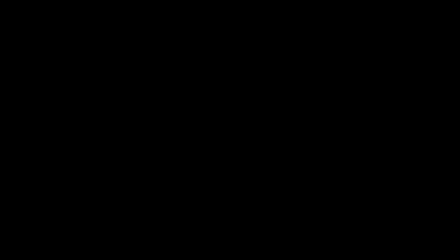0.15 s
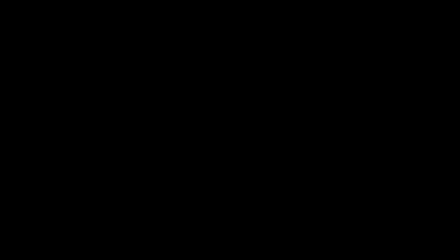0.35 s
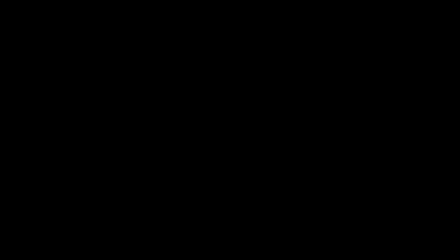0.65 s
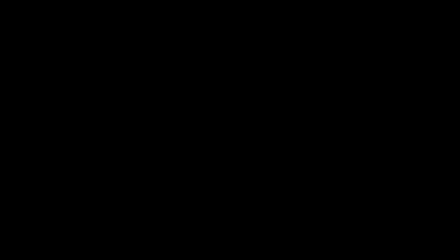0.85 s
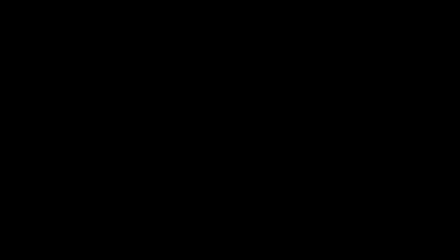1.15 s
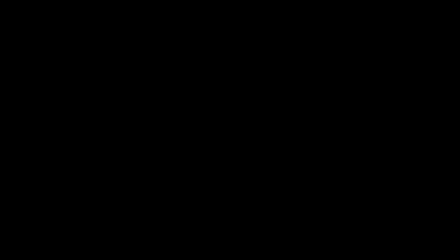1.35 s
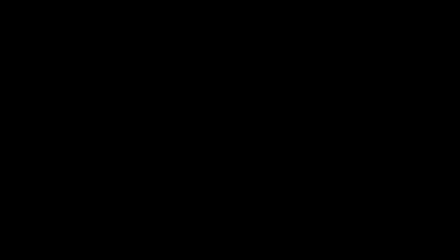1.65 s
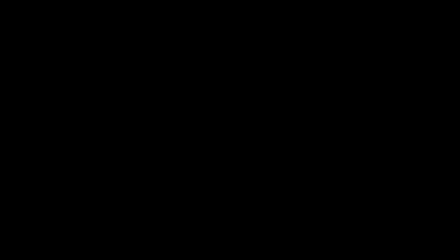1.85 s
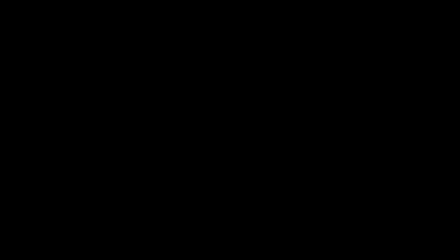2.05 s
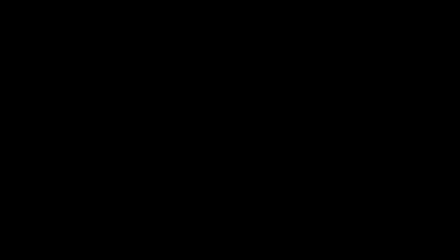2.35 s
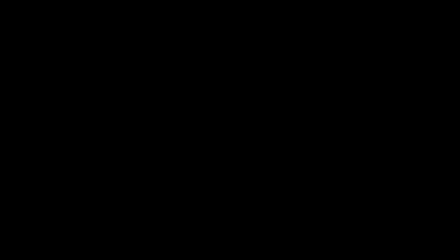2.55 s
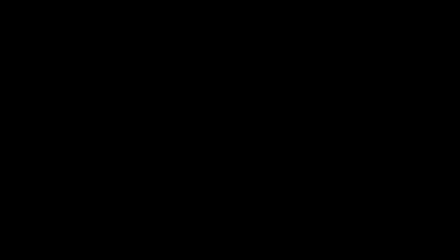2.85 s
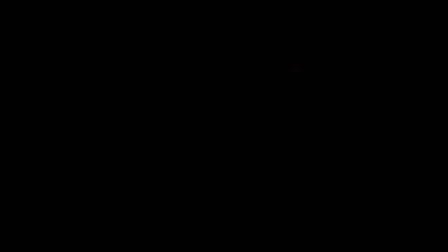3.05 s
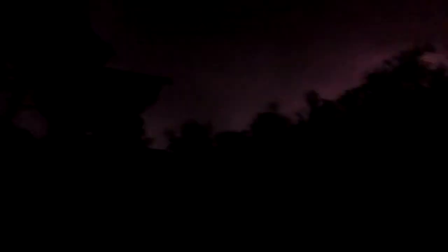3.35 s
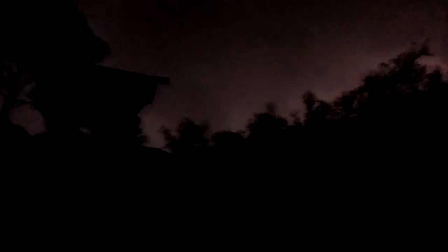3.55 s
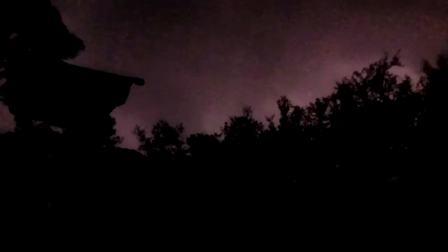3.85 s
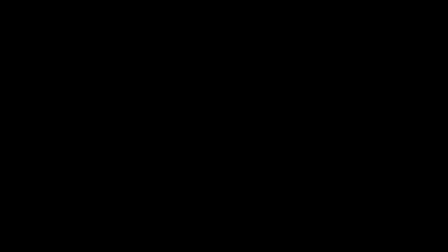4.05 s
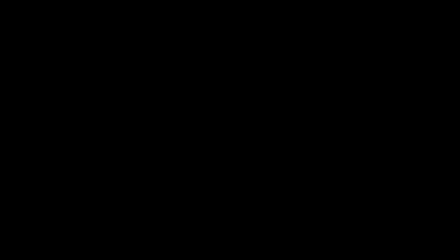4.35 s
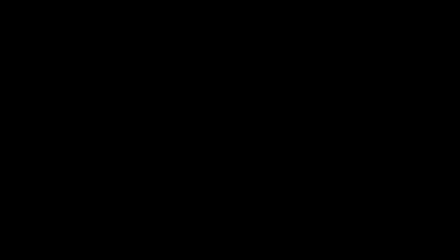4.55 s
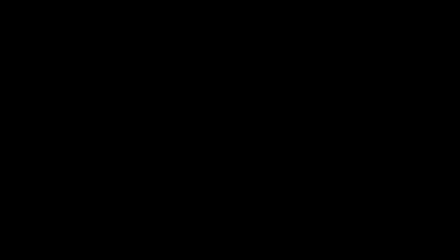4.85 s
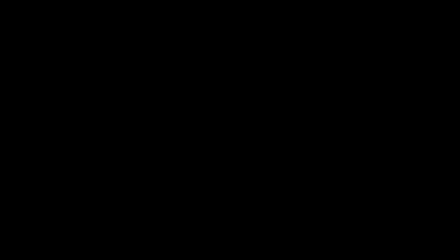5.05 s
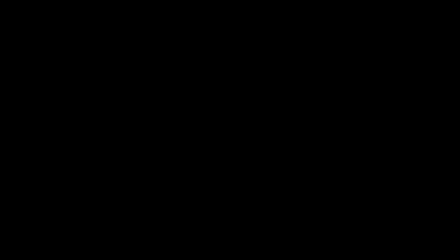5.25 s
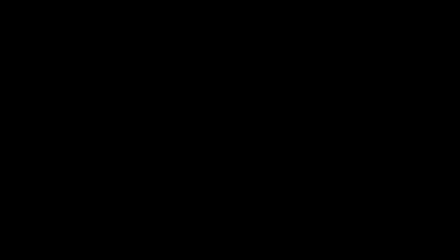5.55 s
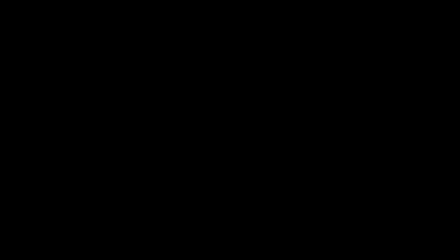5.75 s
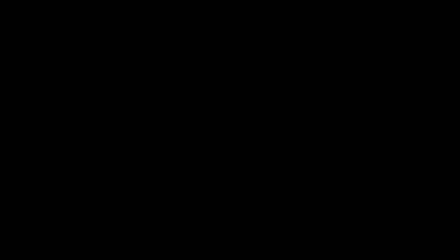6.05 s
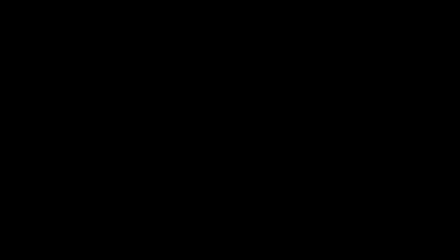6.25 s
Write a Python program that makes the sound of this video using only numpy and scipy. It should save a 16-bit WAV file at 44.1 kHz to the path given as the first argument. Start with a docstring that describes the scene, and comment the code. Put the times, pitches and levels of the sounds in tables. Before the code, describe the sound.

A garden before rain: quiet airy hush and insects, then bass-heavy thunder swells in overlapping waves, slightly squashed by automatic level control at its loudest. It recedes gradually, leaving a steady thin cricket trill, small leaf brushes and increasing light patter. A few hard, dry drops click near the microphone, including small clusters towards the end. The thunder is muffled and far, with no sharp crack.

```python
"""Distant thunder over a garden at night

Thunder swells and rolls in overlapping peals: bands of roaring noise under peal and surge envelopes. A tree
cricket trills (a pulsed tone); three smaller insects chirp higher up (whistles in raspy noise). Sharp drops
like first raindrops land near the microphone (damped modes and a noise splash), with fainter patter. Thin
glassy ticks flicker near 12 kHz, mostly while the thunder is loudest. A light breeze stirs rustles and a hush
of air (coloured noise). The recorder's gain control pulls everything down while the thunder is loudest."""
import sys
import numpy as np
from scipy import signal
from scipy.fft import rfft, irfft, next_fast_len
from scipy.io import wavfile
from scipy.ndimage import uniform_filter1d, map_coordinates

SR = 44100
rng = np.random.default_rng(int(sys.argv[2]) if len(sys.argv) > 2 else 0)


def to_wav(sig):
    """Store sig (one row per channel, or 1-D mono) as 16-bit WAV at the path in sys.argv[1].

    Samples outside -1..1 are clipped; the rate is SR.
    """
    pcm = np.clip(np.atleast_2d(sig), -1, 1) * 32767
    pcm = np.round(pcm).astype(np.int16)
    wavfile.write(sys.argv[1], SR, pcm.T)  # frames by channels


N = 283563


def amp(db):
    """Decibels to gain."""
    return 10 ** (np.asarray(db) / 20)


def unit(x):
    """Scale to rms 1."""
    return x / np.sqrt(np.mean(x ** 2) + 1e-20)


def along(points, hz):
    """Interpolate (frequency [Hz], value) points on a log frequency axis."""
    point_hz, values = np.transpose(points)
    return np.interp(np.log(hz + 1), np.log(point_hz + 1), values)


def curve(points):
    """One value per sample from (time [s], value) points."""
    time_s, values = np.transpose(points)
    return np.interp(np.arange(N) / SR, time_s, values)


def wobble(rate_hz):
    """Smooth random curve through rate_hz random knots a second."""
    knots = rng.standard_normal(int(N * rate_hz / SR) + 4)
    return map_coordinates(knots, [np.arange(N) * rate_hz / SR])


def filtered(x, response):
    """Multiply the spectrum of x by response(hz)."""
    size = next_fast_len(len(x) + SR // 4)
    spectrum = rfft(x, size) * response(np.fft.rfftfreq(size, 1 / SR))
    return irfft(spectrum, size)[:len(x)]


def noise(response):
    """Coloured noise of rms 1."""
    return unit(filtered(rng.standard_normal(N), response))


def patchy(response, depth_db, size=512):
    """Coloured noise of rms 1 that glitters in small patches of time and pitch."""
    z = signal.stft(rng.standard_normal(N), nperseg=size)[2]
    field = rng.standard_normal(z.shape)
    for axis in (0, 0, 1, 1):
        field = uniform_filter1d(field, size=3, axis=axis)
    glitter = signal.istft(z * amp(depth_db * unit(field)), nperseg=size)[1][:N]
    return unit(filtered(glitter, response))


def below(hz, edge_hz, order):
    """Gain of a smooth low-pass."""
    return 1 / np.sqrt(1 + (hz / edge_hz) ** (2 * order))


def above(hz, edge_hz, order):
    """Gain of the matching high-pass."""
    return (hz / edge_hz) ** order * below(hz, edge_hz, order)


def swell(time_s, length_s):
    """Gaussian rise and fall centred on time_s, sigma = length_s / 2."""
    age_s = np.arange(N) / SR - time_s
    return np.exp(-np.minimum(2 * (age_s / length_s) ** 2, 50))


# far foliage, near foliage, microphone hiss: (frequency [Hz], relative density [dB per Hz])
HUSH_COLOUR = [(100, -1.5), (500, 12), (900, 8.5), (1400, 3.5), (1900, -3.5), (2500, -13), (3500, -16),
               (6000, -39)]
HISS_COLOUR = [(1500, -13.5), (2500, 4.5), (3050, 3.5), (3500, -1), (4600, -3.5), (6000, -7), (7200, -10),
               (8200, -29), (12000, -38.5)]
MIC_COLOUR = [(1000, -2.5), (8000, -5), (13500, -0.5), (14400, 8.5), (15200, 17), (15800, 13)]
# breeze: (time [s], strength [dB])
BREEZE_STRENGTH = [(0.3, 0.5), (0.7, 0), (1.6, -3.5), (2.5, -4), (3.2, -1.5), (4.0, 0.5), (4.8, 2),
                   (6.4, 2)]


def air(hush_db=-48.5, hiss_db=-65, hiss_follows=0.94, mic_db=-75):
    """Breeze draws an even hush from far foliage and a fluttering hiss from near leaves, over mic hiss."""
    breeze_db = curve(BREEZE_STRENGTH)
    stir_db = 1.6 * wobble(45)
    far = patchy(lambda hz: amp(along(HUSH_COLOUR, hz)), depth_db=1.2)
    near = patchy(lambda hz: amp(along(HISS_COLOUR, hz)), depth_db=3.4)
    mic = noise(lambda hz: amp(along(MIC_COLOUR, hz)))
    hush = amp(hush_db + breeze_db + stir_db / 5) * far
    hiss = amp(hiss_db + hiss_follows * breeze_db + stir_db) * near
    return hush + hiss + amp(mic_db) * mic


# clearest rustles: (time [s], length [s], level [dB], centre [Hz])
CLEAR_RUSTLES = [(.08, 0.42, -59.5, 3000), (0.323, 0.079, -64.5, 4400), (0.952, 0.015, -60, 4430),
                 (1.487, 0.022, -61.5, 3520), (1.58, .005, -54, 2200), (1.903, .006, -55, 2000),
                 (2.826, 0.021, -54.5, 2960), (3.145, 0.024, -53.5, 3080), (3.35, 0.019, -64.5, 5500),
                 (3.366, 0.037, -57.5, 1900), (3.983, 0.054, -62, 5140), (4.068, 0.056, -66, 3800),
                 (4.15, 0.026, -53.5, 3360), (4.251, 0.016, -65.5, 8900), (4.553, 0.0088, -61, 8700),
                 (4.57, 0.048, -58, 3800), (4.72, 0.024, -60, 3600), (4.85, 0.028, -64.5, 5300),
                 (5.04, 0.11, -60, 4900), (5.147, 0.0085, -52.5, 4300), (5.25, 0.058, -61, 3800),
                 (5.4, 0.057, -56, 3900), (5.625, 0.014, -50, 2480), (5.781, 0.027, -54, 4400),
                 (6.205, 0.03, -55.5, 3660), (6.31, 0.13, -54.5, 2270), (6.341, 0.022, -59, 4000)]


def rustles(grain_db=4, octaves=0.51, stirs_from_s=3.9,
            faint_db=-67, faint_hz=4000, faint_length_s=0.019, count=10):
    """Brief grainy brushes of band noise; faint ones come at random once the breeze picks up."""
    out = np.zeros(N)
    glitter = patchy(np.ones_like, depth_db=2.2)
    grain = amp(grain_db * wobble(500)) * glitter
    slot_s = (N / SR - stirs_from_s) / count
    faint = []
    for k, (when, size, tune) in enumerate(rng.random((count, 3))):
        time_s = stirs_from_s + (k + when) * slot_s
        length_s = faint_length_s * 2 ** (size - .5)
        faint.append((time_s, length_s, faint_db, faint_hz * 2 ** (tune - .5)))
    for time_s, length_s, db, centre_hz in CLEAR_RUSTLES + faint:
        def band(hz):
            distance = np.log2((hz + 1) / centre_hz) / octaves
            return amp(-24 * np.log2(np.hypot(1, distance)))
        out += amp(db) * swell(time_s, length_s) * unit(filtered(grain, band))
    return out


def struck(modes, pitch_hz, t, damping=1):
    """Heavily damped modes of alternating sign, a little different at each blow; peak 1."""
    ring = np.zeros(len(t))
    for k, (ratio, width_hz, db) in enumerate(modes):
        gain = (-1) ** k * amp(db + rng.normal(0, 0.58))
        decay = np.exp(-np.pi * width_hz * damping * t)
        ring += gain * width_hz * decay * np.sin(2 * np.pi * pitch_hz * ratio * t)
    ring *= 1 - np.exp(-(t / 0.00016) ** 2)  # soft contact
    return ring / np.abs(ring).max()


# modes rung by near and far drops: (pitch ratio, width before damping [Hz], relative level [dB])
RING_MODES = [(.8, 429.5, -13.5), (1.03, 362.6, -3), (1.14, 388, -2), (1.28, 400, -12.5), (1.61, 565, -19)]


def patter(db=-56.5, spread_db=3.8, centre_hz=3300, octaves=2.2, thickens=0.45, count=70):
    """Farther drops ring at random, more of them as time goes on, each with its own small pitch."""
    out, t = np.zeros(N + SR), np.arange(SR // 50) / SR
    for when, size, tune in rng.random((count, 3)):
        start = int(when ** thickens * N)
        gain = amp(db - spread_db * np.log(size + 0.083))
        pitch_hz = centre_hz * 2 ** (octaves * (tune - .5))
        out[start:][:len(t)] += gain * struck(RING_MODES, pitch_hz, t)
    return out[:N]


# clearest ticks: (time [s], level before gain_db [dB])
CLEAR_TICKS = [(1.0203, -57), (1.3204, -56), (1.501, -47.5), (1.6806, -52.5), (1.7409, -49.5),
               (1.8815, -54.5), (2.024, -61), (2.182, -60), (2.501, -56.5), (3.285, -63)]


def ticks(gain_db=4, pitch_hz=12000, length_s=.0004,
          faint_db=-61, faint_spread_db=2, around_s=1.9, spread_s=.45, count=9):
    """Glassy sine bursts a few cycles long; fainter ones scatter around the loudest thunder."""
    t, envelope = np.arange(N) / SR, np.zeros(N)
    faint = [(around_s + spread_s * when, faint_db + faint_spread_db * size)
             for when, size in rng.standard_normal((count, 2))]
    for time_s, db in CLEAR_TICKS + faint:
        envelope += amp(db + gain_db) * swell(time_s, length_s)
    return envelope * np.sin(2 * np.pi * pitch_hz * t)


# chirping insects: (first chirp [s], initial period [s], slowing [1/s], pitch [Hz],
# whistle level before gain_db [dB], chirp length [s], rasp re whistle [dB], rest from [s], rest until [s])
CHIRPING_INSECTS = [(0.225, 0.323, 0.0155, 7170, -79, 0.07, -4, 1.0, 2.45),
                    (0.2, 0.274, 0, 7485, -79, 0.08, -6, 1.15, 3.35),
                    (0.06, 1.257, 0, 7170, -79, 0.11, 5, 1.7, 7)]


def chirpers(gain_db=2.5, scatter_db=2.0, jitter_s=.008, scatter_hz=12):
    """Unsteady whistles in a raspy noise skirt, repeated at each insect's pace, silent over its rest."""
    t, out = np.arange(N) / SR, np.zeros(N)
    for (first_s, period_s, slowing, pitch_hz, db, length_s, rasp_db,
         rest_from_s, rest_until_s) in CHIRPING_INSECTS:
        whistle = np.exp(.9j * wobble(90))
        real, imag = (noise(lambda hz: below(hz, 220, order=3)) for _ in range(2))
        voice = whistle + amp(rasp_db) * (real + 1j * imag) / np.sqrt(2)
        age_s = t - first_s + jitter_s * wobble(2.2)
        paced_s = age_s * (1 - slowing * age_s)
        from_chirp_s = (paced_s + period_s / 2) % period_s - period_s / 2
        envelope = np.exp(-2 * (from_chirp_s / length_s) ** 2)
        singing = 1. * ((t < rest_from_s) | (t > rest_until_s))
        song = amp(db + gain_db + scatter_db * wobble(4.1)) * envelope
        song *= uniform_filter1d(singing, size=2000)
        phase = 2 * np.pi * np.cumsum(pitch_hz + scatter_hz * wobble(4.1)) / SR
        out += np.sqrt(2) * song * (voice * np.exp(1j * phase)).real
    return out


# tree cricket effort: (time [s], relative level [dB])
TRILL_EFFORT = [(0, -6), (.35, 3), (1.2, 3), (2.1, -1.5), (2.5, -1.5), (3.4, 1.8), (3.51, 8.5), (3.62, 2),
                (3.85, 2), (4.2, 4.5), (5.3, 2), (6.4, 3.5)]


def tree_cricket(pitch_hz=3061, stroke_hz=66.5, db=-64.0, sharpness=1.4,
                 chorus_db=-70, chorus_width_hz=110):
    """Wing strokes pulse a tone that sags in pitch, uneven in strength; a far chorus is a noise band."""
    t = np.arange(N) / SR
    turn = 2 * np.pi * (stroke_hz * t + .1 * wobble(6))
    pulse = np.abs(np.sin(turn / 2)) ** sharpness
    sag = -.75 * np.cos(turn) + .35 * np.sin(turn)  # phase [rad]
    drift = 1.5 * wobble(11) + .18 * wobble(70) + sag
    wing = np.sin(2 * np.pi * pitch_hz * t + drift)
    unevenness = amp(1.3 * wobble(9) + 2 * wobble(55))
    near = amp(db) * unit(unevenness * pulse * wing)
    chorus = amp(chorus_db) * noise(lambda hz: below(hz - pitch_hz, chorus_width_hz, order=3))
    return amp(curve(TRILL_EFFORT)) * (near + chorus)


# near drops: (time [s], ring [dB], knock [dB], splash [dB], ring pitch [Hz], splash edge [Hz],
# ring damping [ratio])
NEAR_DROPS = [(1.2315, -27, -34, -53.5, 2950, 5400, 0.53), (2.3292, -9, -26, -10, 3000, 7300, 0.86),
              (4.387, -44, -54, -67, 2830, 5930, 0.9), (4.9743, -24, -22, -23.5, 3040, 6230, 0.61),
              (4.9983, -33.5, -41, -48, 2800, 5950, 1), (5.022, -34, -41, -38, 3030, 12000, 1),
              (5.0318, -32, -33, -18, 3630, 15000, 0.86), (5.8790, -19, -30, -27, 2740, 9000, 0.58),
              (5.893, -31, -27.5, -54, 2980, 6000, 1.2), (5.932, -24.5, -28, -17.5, 3240, 13660, 1.1)]
# knock modes: (pitch ratio, width [Hz], relative level [dB])
KNOCK_MODES = [(1, 237, 1), (1.42, 221, -2.5), (1.92, 310, -3)]
# splash colour: (frequency [Hz], relative density [dB per Hz])
SPLASH_COLOUR = [(700, -32), (2200, -20), (2900, -15.5), (4000, -3), (5800, .7), (7000, -7), (8500, -6.5),
                 (10500, -6.5), (13000, -17), (15200, -4), (16000, -8.5)]


def drops(knock_hz=960, echo_db=-20, echo_t60_s=0.085):
    """Each drop knocks, rings for a few milliseconds and splashes; the surroundings answer faintly."""
    out, t = np.zeros(N + SR), np.arange(SR // 8) / SR
    for time_s, ring_db, knock_db, splash_db, pitch_hz, edge_hz, damping in NEAR_DROPS:
        burst = rng.standard_normal(len(t)) * .07 * np.exp(-t / .0015) + (t == 0)
        burst = np.pad(burst, (20, 0))  # room for the zero-phase filter
        spray = filtered(burst, lambda hz: amp(along(SPLASH_COLOUR, hz)) * below(hz, edge_hz, order=4))
        spray = spray[:len(t)]
        ring = amp(ring_db) * struck(RING_MODES, pitch_hz, t, damping)
        knock = amp(knock_db) * struck(KNOCK_MODES, knock_hz, t)
        hit = ring + knock + amp(splash_db) * spray / np.linalg.norm(spray)
        tail = rng.standard_normal(len(t)) * amp(-60 * t / echo_t60_s)
        echo = signal.fftconvolve(hit, tail / np.linalg.norm(tail))[:len(t)]
        out[round(time_s * SR):][:len(t)] += hit + amp(echo_db) * echo
    return out[:N]


def rumble(roar, span_s=0.11):
    """Countless overlapping shock fronts merge into a roar of even strength over span_s."""
    size = max(int(span_s * SR), 2)
    power = uniform_filter1d(uniform_filter1d(roar ** 2, size), size)
    return unit(roar / np.sqrt(np.abs(power) + 1e-9))


def peal(crest_s, rise_s, fall_s):
    """Level of one peal [dB]: steady climb, rounded crest, steady decay."""
    t = np.arange(N) / SR - crest_s
    return -10 * (np.hypot(1, t / np.where(t < 0, rise_s, fall_s)) - 1)


# thunder colour: (frequency [Hz], relative density [dB per Hz])
THUNDER_COLOUR = [(12, -18), (22, -19), (43, -20.5), (60, -14.5), (75, -7), (100, -3.5), (122, 3),
                  (141, 3.5), (160, 2), (185, -2), (250, -8), (300, -10.5), (400, -19.5), (620, -30),
                  (850, -43), (1400, -83)]
# constant far storm: (depth, boom, body, growl) [dB]
FAR_STORM_LEVELS = [-41.5, -47.5, -46.5, -58]
# peals: (crest [s], rise [s], fall [s], level [dB], depth, boom and growl re level [dB])
THUNDER_PEALS = [(0.68, 0.19, 0.33, -37.5, -3, 4.3, -13.5), (1.099, 0.23, 0.33, -29, -4, 7.7, -11.5),
                 (1.448, 0.14, 0.3, -20.5, -5, 3.5, -19), (1.929, 0.45, 0.84, -20, -1, 8, -13),
                 (2.441, 0.2, 0.18, -24, -5, 7, -13), (2.849, 0.19, 0.19, -23.5, -4.5, 0.5, -9),
                 (3.382, 0.44, 0.23, -23.5, -6.5, -0.5, -9), (3.62, 0.07, 0.52, -35, 4.5, 9.5, -3),
                 (4.23, 0.16, 0.28, -29, -7.5, 4.4, -10.5), (4.88, 0.21, 0.34, -34, -6, 7.5, -10),
                 (5.08, 0.17, 0.16, -35.5, -5.5, 0, -7.5), (5.74, 0.34, 0.31, -34, 1.5, 8, -6.5),
                 (6.3, 0.4, .4, -38, -8, 5.4, -13)]
# surges rolling through the peals: (crest [s], sigma [s], level [dB], pitch [Hz])
ROLLING_SURGES = [(.48, 0.041, -35.5, 278), (1.041, 0.041, -24, 150), (1.42, 0.095, -20, 272),
                  (1.804, 0.092, -17.5, 70), (1.91, 0.043, -8, 140), (2.1, 0.056, -9, 141),
                  (2.242, 0.075, -20.5, 70), (2.465, 0.065, -13, 140), (2.636, 0.067, -22.5, 71),
                  (2.842, .06, -22, 70), (2.955, .06, -28.5, 140), (3.223, 0.094, -23, 140),
                  (3.265, 0.032, -16.5, 68), (3.398, 0.023, -24, 267.6), (3.57, 0.066, -20.5, 70),
                  (4.044, 0.036, -21, 138), (4.21, 0.023, -22, 119), (4.3, 0.023, -25, 177),
                  (4.877, 0.022, -28, 140), (5.11, .05, -29.5, 179), (5.35, 0.025, -31.5, 88),
                  (5.571, 0.038, -32, 219), (5.747, 0.11, -21.5, 125), (5.99, 0.04, -27.5, 140),
                  (6.386, 0.038, -34.5, 70)]
# boom sinks as peals arrive from farther away: (time [s], power share of its upper half [ratio])
BOOM_UPPER_SHARE = [(1.0, .7), (2.0, 0.71), (3.2, 0.47), (4.2, 0.27), (5.7, 0.23)]


def thunder(shudder_db=0.76, shudder_hz=12, edge_db=-23, edge_hz=720, surge_octaves=.6):
    """Peals from along the channel overlap: far parts a deep boom, nearer ones keep body and growl."""
    power = amp(FAR_STORM_LEVELS)[:, None] ** 2  # rows: depth, boom, body, growl
    for crest_s, rise_s, fall_s, db, depth_db, boom_db, growl_db in THUNDER_PEALS:
        band_db = db + np.array([depth_db, boom_db, 0, growl_db])
        power = power + np.outer(amp(band_db), amp(peal(crest_s, rise_s, fall_s))) ** 2
    centres_hz = np.array([70, 140, 280, 560])
    for crest_s, sigma_s, db, pitch_hz in ROLLING_SURGES:
        share = np.exp(-(np.log2(centres_hz / pitch_hz) / surge_octaves) ** 2)
        share = share / np.linalg.norm(share)
        power = power + np.outer(amp(db) * share, swell(crest_s, 2 * sigma_s)) ** 2

    def band(low_hz, high_hz):
        return noise(lambda hz: amp(along(THUNDER_COLOUR, hz))
                     * above(hz, low_hz, order=8) * below(hz, high_hz, order=8))

    upper = np.clip(curve(BOOM_UPPER_SHARE), 0, 1)
    sinking = np.sqrt(1 - upper) * band(100, 145) + np.sqrt(upper) * band(145, 215)
    depth, boom = rumble(band(10, 100)), rumble(sinking)
    body, growl = rumble(band(215, 400)), rumble(band(400, 1600))
    # the air has absorbed nearly all of the treble
    edge = amp(edge_db) * noise(lambda hz: above(hz, 960, order=8) * below(hz, edge_hz, order=5))
    out = np.zeros(N)
    for band_power, roar in zip(power, (depth, boom, body, growl + edge)):
        out += np.sqrt(band_power) * amp(shudder_db * wobble(shudder_hz)) * roar
    return out


def scene():
    """All sources at one microphone."""
    background = air() + rustles() + patter() + ticks()
    insects = chirpers() + tree_cricket()
    return (background + insects + drops() + thunder())[None]


def record(dry, threshold_db=-19.0, squeeze=0.51, span_s=0.061, floor_db=-82, top_hz=15850):
    """Gain control turns loud passages down, electronics add steady hiss, a low-pass limits the band."""
    size = max(int(span_s * SR), 2)
    level = np.sqrt(np.abs(uniform_filter1d(dry[0] ** 2, size)))
    over = (1 + (level / amp(threshold_db)) ** 6) ** (1 / 6)  # soft knee
    out = dry[0] * over ** -squeeze + amp(floor_db) * rng.standard_normal(N)
    return filtered(out, lambda hz: below(hz, top_hz, order=60))[None]


dry = scene()
out = record(dry)
to_wav(out)
```